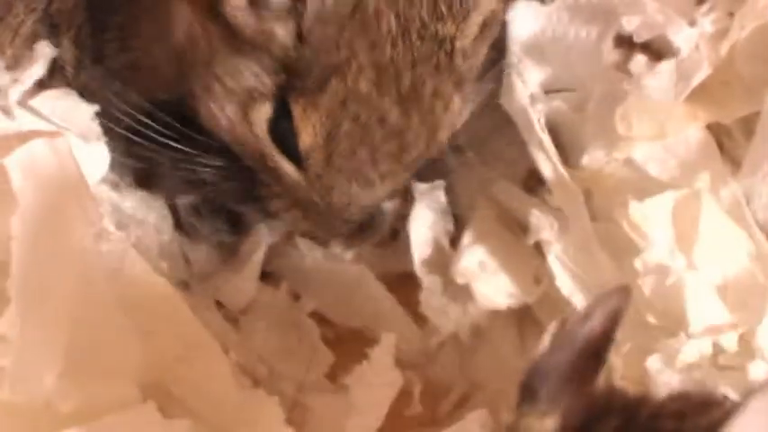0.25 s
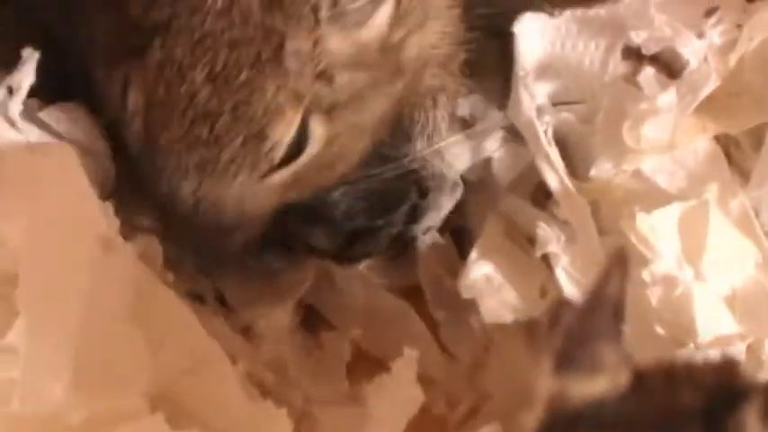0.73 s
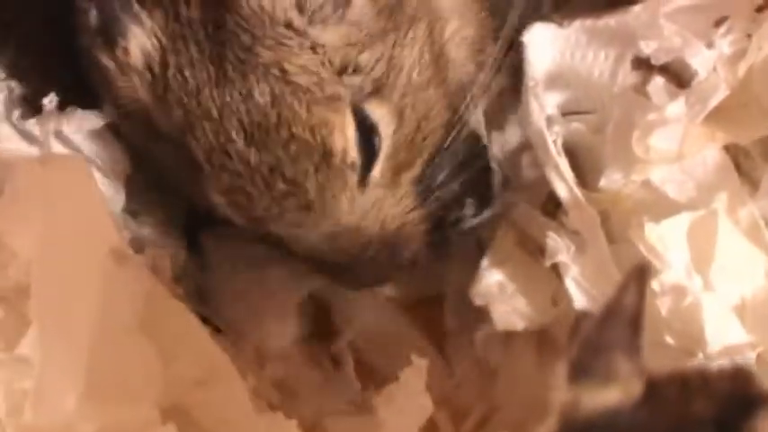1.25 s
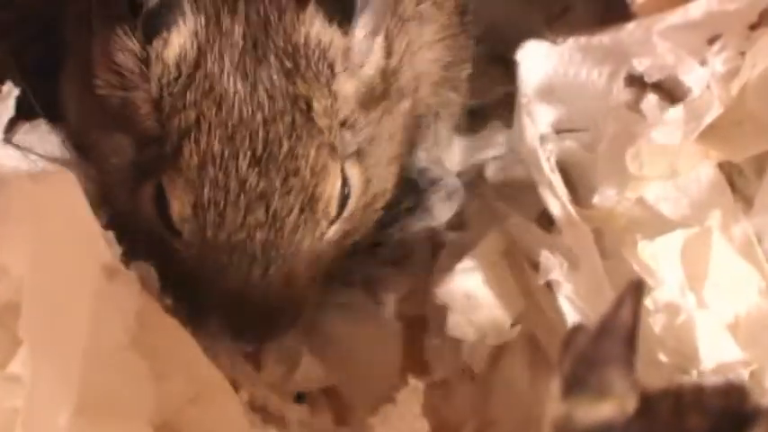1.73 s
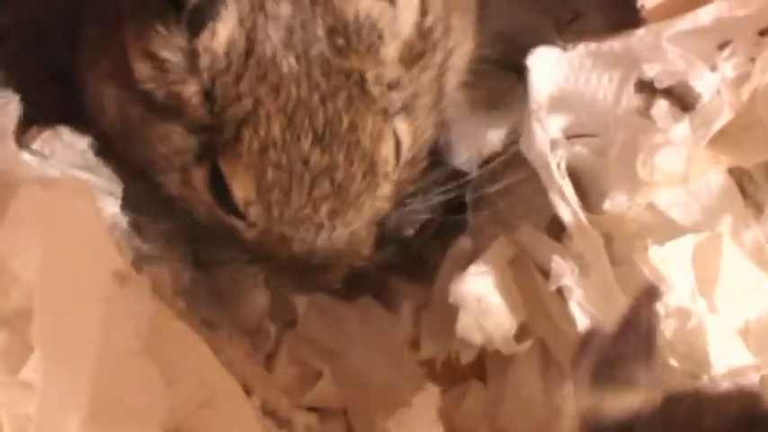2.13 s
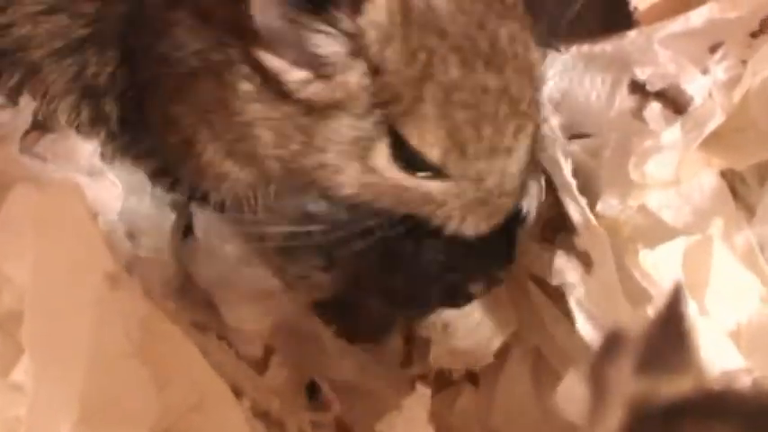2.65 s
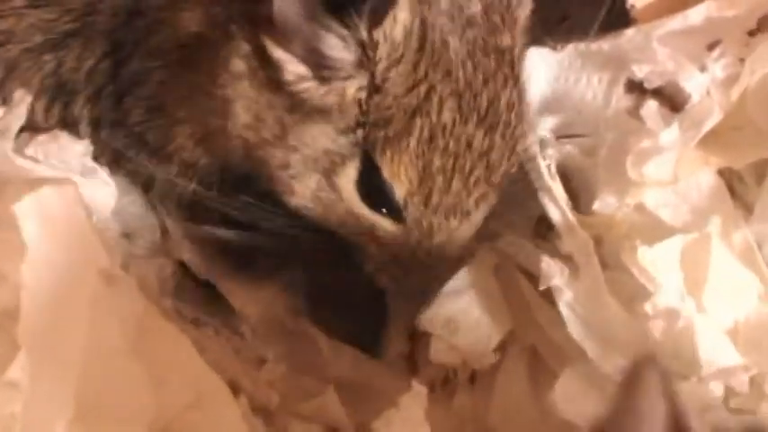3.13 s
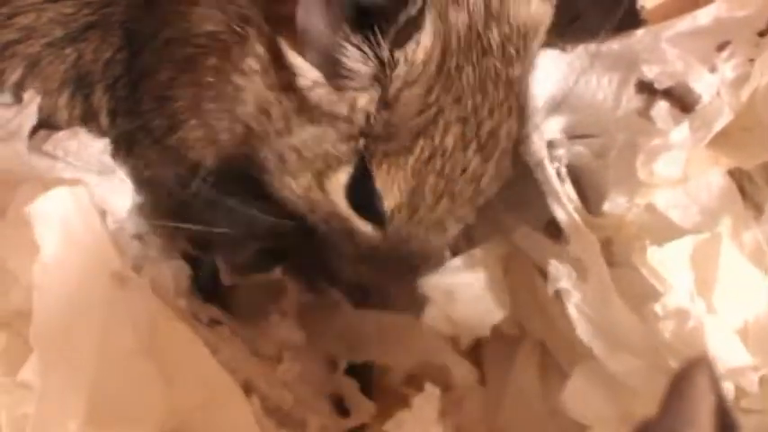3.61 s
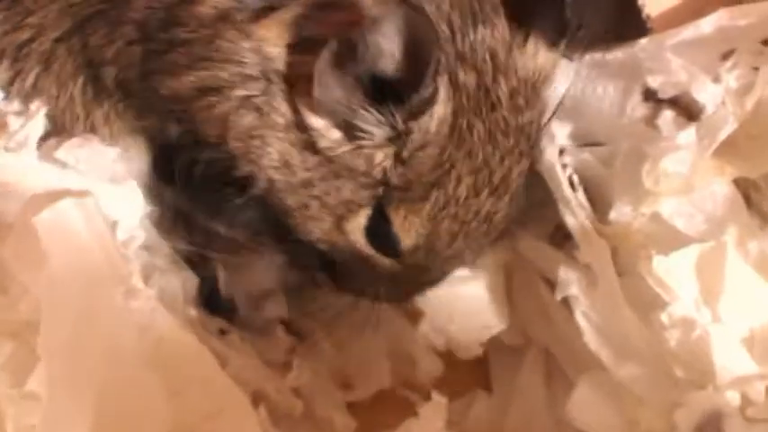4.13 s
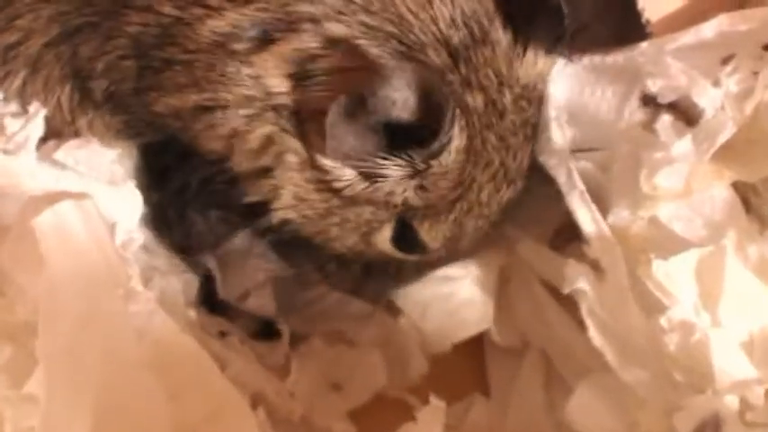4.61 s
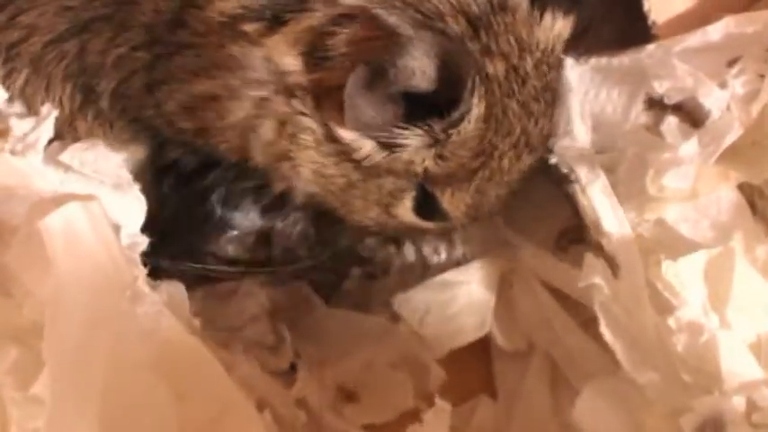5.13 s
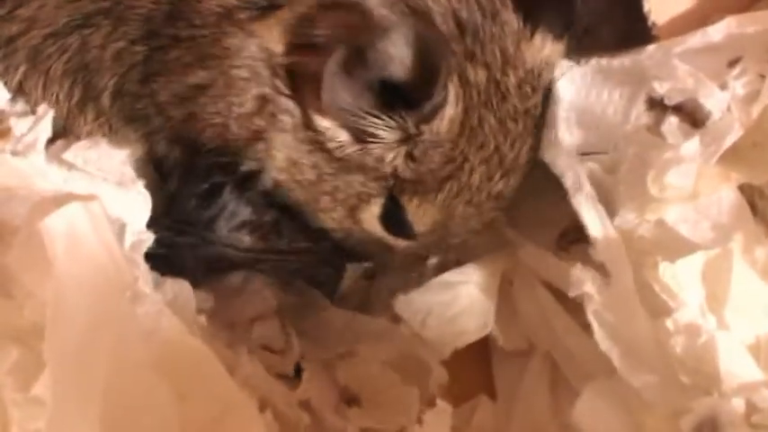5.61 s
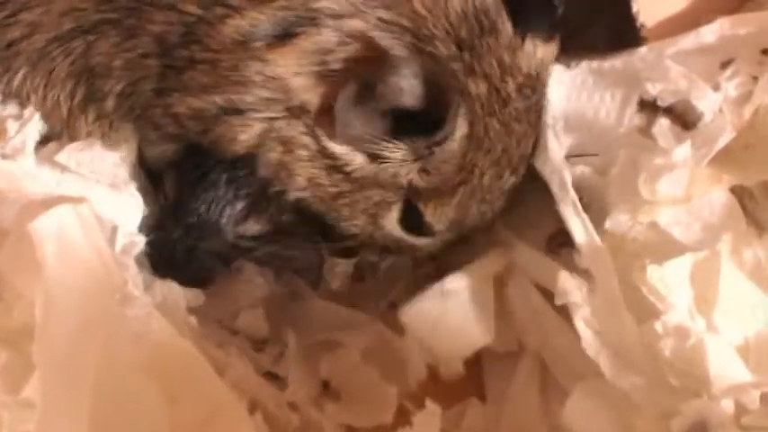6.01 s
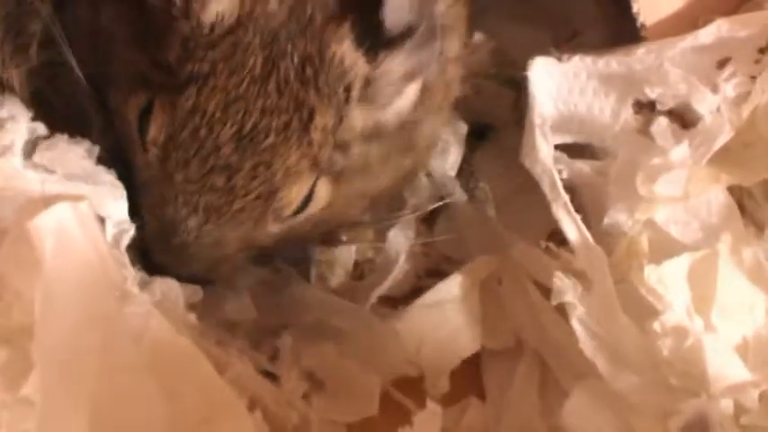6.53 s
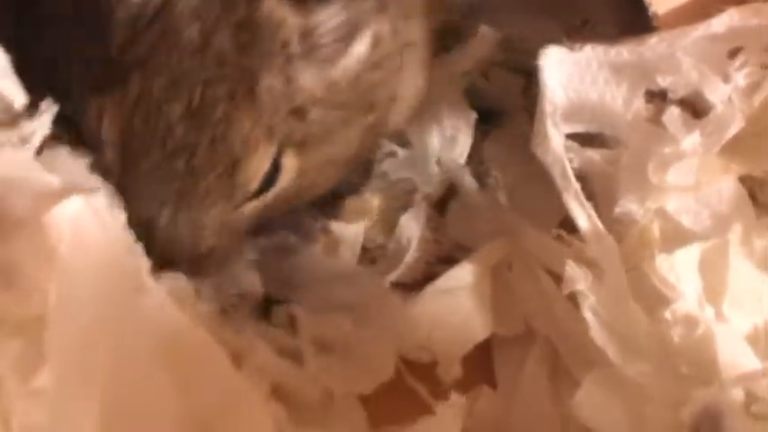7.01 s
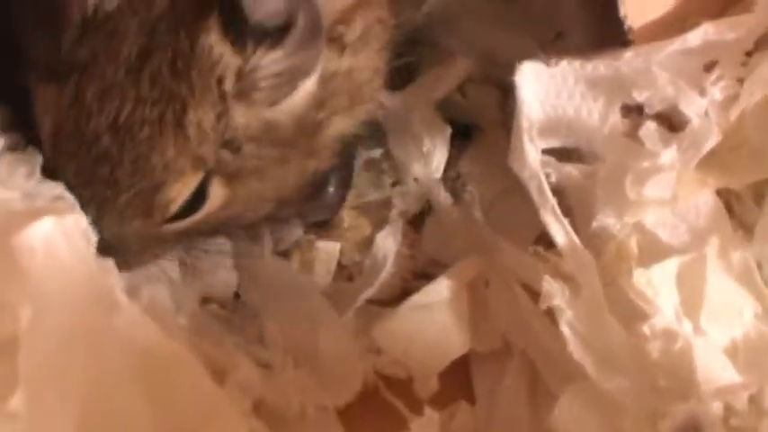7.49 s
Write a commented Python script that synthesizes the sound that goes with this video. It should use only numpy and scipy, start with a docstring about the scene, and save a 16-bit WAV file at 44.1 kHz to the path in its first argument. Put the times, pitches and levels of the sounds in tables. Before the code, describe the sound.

Close stereo sound of a paper nest in a quiet small room, with faint hiss, a fluttering airy hiss, a weak fan tone and a low wavering hum. At 0 s a clipped raspy squeak and light paper rustle, then a pair of joined squeaks at 0.25. A thin high whistle holds around 0.9-1.2, followed by low, rough little cries at 1.2, 1.3 and 1.75. Another faint whistle runs from 1.9; a squeak at 2.2 meets a sharp bright tick at 2.3, then a rising-loudness whine slides downward until 2.5. Squeaks return at 3.4, with a bright piercing one at 3.8 and another at 4.9. Paper crackles in swells from 4.3 to 5.9. Hollow cage knocks cluster at 5.75-5.95, ringing briefly. A softer bump at 6.2, a clear squeak at 6.6, rustle and whistle near 7, a raspy squeak at 7.2, and tiny whimpers end at 7.7.

```python
"""Degu pups in a nest of shredded paper squeak and whistle close to a camera as their mother noses at them.
Squeaks are gliding harmonics with rasping breath, split cycles and cracked tails; whistles are nearly pure.
Paper is showers of tiny filtered pulses; ticks and cage bumps are struck resonances.
A wavering low hum, a faint fan tone, coloured hiss and a fluttering hiss fill the quiet room.
Cage echoes, a diffuse tail and the two microphones' spacing place the sounds in stereo."""
import sys
import numpy as np
from scipy import signal
from scipy.fft import rfft, irfft, next_fast_len
from scipy.io import wavfile
from scipy.ndimage import uniform_filter1d, map_coordinates

SR = 44100
rng = np.random.default_rng(int(sys.argv[2]) if len(sys.argv) > 2 else 0)


def master_out(mix):
    """Clip the mix to full scale and print it as 16-bit PCM to the path in sys.argv[1]."""
    frames = np.transpose(np.atleast_2d(mix))
    ceiling = np.clip(frames, -1, 1)
    pcm = np.round(ceiling * 32767).astype(np.int16)
    wavfile.write(sys.argv[1], SR, pcm)


N = 342216
TOP_HZ = 15900  # band limit of the overtones and of the camera


def amp(db):
    """Decibels to gain."""
    return 10 ** (np.asarray(db) / 20)


def unit(x):
    """Scale to rms 1."""
    return x / np.sqrt(np.mean(x ** 2) + 1e-20)


def along(points, hz):
    """Interpolate (Hz, value) points on a log frequency axis."""
    f, value = np.transpose(points)
    return np.interp(np.log(hz + 1), np.log(f + 1), value)


def wobble(n, rate):
    """A smooth random curve, rate knots a second."""
    knots = rng.standard_normal(int(n * rate / SR) + 4)
    return map_coordinates(knots, [np.arange(n) * rate / SR])


def fade(n, edge):
    """A gate that opens and closes within edge seconds."""
    i = np.arange(n)
    return np.clip(np.minimum(i, i[::-1]) / (edge * SR), 0, 1)


def filtered(x, response):
    """Multiply the spectrum of x by a response of frequency."""
    n = x.shape[-1]
    m = next_fast_len(n + 8192)
    spectrum = rfft(x, m) * response(np.fft.rfftfreq(m, 1 / SR))
    return irfft(spectrum, m)[..., :n]


def resonance(f, centre, width):
    """Causal response of one damped mode."""
    return 1j * f * width / (centre ** 2 - f ** 2 + 1j * f * width)


def add(track, s, x):
    """Mix x into the track from time s."""
    part = track[..., max(round(s * SR), 0):][..., :x.shape[-1]]
    part += x[..., :part.shape[-1]]


def spread(pair, spectrum):
    """Two unrelated noises become coloured, partly alike stereo of rms 1."""
    # likeness of left and right: (frequency [Hz], correlation [-1 to 1])
    likeness = [(60, 0.65), (180, -0.34), (550, -0.57), (1650, 0.38), (4970, 0.17), (15000, 0.92)]

    def mix(f):
        turn = np.arccos(np.clip(along(likeness, f), -1, 1)) / 2
        return amp(along(spectrum, f)) * [np.cos(turn), np.sin(turn)]

    mid, side = filtered(pair, mix)
    return unit(np.array([mid + side, mid - side]))


def arch(rise, fall, tail, start_hz, crest_hz, end_hz, tail_hz, bend,
         low_db, high_db, crest_rough, end_rough):
    """Vocal effort climbs and sags, and may crack into a tail: pitch, two levels, roughness, cracking."""
    # body resonances the fundamental glides through: (frequency [Hz], gain [dB])
    chest = [(900, -0.5), (1150, -6), (1400, 1), (1720, 2), (2030, -3.5), (2300, -0.5), (2600, -3.5),
             (2900, 7), (3400, 1.5)]
    onset_share, onset_db, onset_rough = 0.22, 26, 0.31  # overtones swell over this share of the rise
    effort_db_per_octave, tiring_db_per_s = 14.5, 27  # overtones grow with pitch, ebb after the crest
    crack_s, crack_rough, tail_rough, tail_fade_db = .018, 0.5, 0.24, 16
    release_s, release_db = 0.0019, 14  # the voice shuts off
    attack_s, attack_db = 0.015, 2  # the fundamental starts this much softer
    tail_sag, waver, least_waver = 0.0695, 0.026, 0.0065  # shares of the pitch

    def ease(u, power):
        return np.sin(np.pi / 2 * np.clip(u, 0, 1)) ** power

    t = np.arange(int((rise + fall + tail) * SR)) / SR
    rising = t / rise
    falling = np.clip((t - rise) / fall, 0, 1)
    since = np.maximum(t - rise - fall, 0)  # seconds into the tail
    jump = ease(since / crack_s, 1.89)
    dying = (since / max(tail, crack_s)) ** 2
    crack = np.sin(np.pi * np.clip(since / crack_s, 0, 1) ** .5)

    rough = crest_rough + onset_rough * (1 - ease(rising, 0.54))
    rough = rough + (end_rough - crest_rough) * ease(falling, 0.88)
    rough = rough + crack_rough * crack + tail_rough * jump

    pitch = start_hz + (crest_hz - start_hz) * ease(rising, bend)
    pitch = pitch + (end_hz - crest_hz) * ease(falling, 3.3 / bend)
    effort_db = effort_db_per_octave * np.log2(pitch / crest_hz)
    effort_db = effort_db - tiring_db_per_s * fall * falling
    effort_db = effort_db - onset_db * (1 - ease(rising / onset_share, 0.62))
    pitch = (pitch + (tail_hz - end_hz) * jump) * (1 - tail_sag * dying)
    pitch = pitch * (1 + (least_waver + waver * rough) * wobble(len(t), 130.9))

    fading_db = tail_fade_db * dying + release_db * np.exp((t - t[-1]) / release_s)
    fundamental_db = low_db + along(chest, pitch) - attack_db * np.exp(-t / attack_s) - fading_db / 2
    overtone_db = high_db + effort_db - fading_db
    return pitch, fundamental_db, overtone_db, rough, ease(2 * since / crack_s, 0.58)


def squeak(pitch, fundamental_db, overtone_db, rough, mouth_hz, mouth_width, top_hz,
           glide=0.0013, jitter=0.033, shimmer_db=7.0, rasp=0.72, least_rasp=0.0081, split=0.17,
           leak=0.035, low_db=-3.5, high_db=0, grunt_hz=1100, grunt_width=550, grunt_db=-1, halving_db=5):
    """Tiny vocal folds sound through the mouth; under strain they shake, split the period and rasp."""
    # colour of throat and mouth: (frequency [Hz], relative gain [dB])
    throat_gain = [(1500, 6.5), (2600, 10.5), (3800, 5.5), (5000, 2.5), (6200, -2), (7900, 4), (9200, 1),
                   (10300, 4), (11800, 4), (12700, 9.5), (14000, -1), (15800, 3.5)]
    n, rough = len(pitch), np.clip(rough, 0, 1)
    # the folds' tension cannot change at once
    pitch = uniform_filter1d(pitch, max(int(glide * SR), 1), mode="nearest")
    phase = 2 * np.pi * np.cumsum(pitch * (1 + jitter * rough * wobble(n, 892.5))) / SR

    def mouth(f):
        opening = abs(resonance(f, mouth_hz, mouth_width)) + leak
        rolloff = 1 / np.sqrt(1 + (f / top_hz) ** 10)
        return opening * amp(along(throat_gain, f)) * rolloff * (f < TOP_HZ)

    def throat(f):
        return resonance(f, grunt_hz, grunt_width)

    # alternate strong and weak cycles put lines halfway between the harmonics
    order = np.arange(3, 29)[:, None] / 2
    weight = mouth(order * pitch) * np.where(order % 1, split * np.sqrt(rough), 1)
    partials = weight * np.sin(order * phase + rng.uniform(0, 2 * np.pi, order.shape))
    lines = partials.sum(0) / np.sqrt((weight ** 2).sum(0) / 2 + 1e-12)

    # air escapes once a cycle
    breath = unit(filtered(rng.standard_normal(n) * (1 + np.cos(phase)), mouth))
    share = np.clip(least_rasp + rasp * rough ** 1.22, 0, 1)
    overtones = np.sqrt(1 - share) * lines + np.sqrt(share) * breath

    # split and irregular cycles also ring the throat's lowest resonance
    halved = amp(halving_db) * abs(throat(pitch / 2)) * np.sin(phase / 2)
    irregular = unit(filtered(rng.standard_normal(n), lambda f: throat(f) ** 2))
    grunt = halved + amp(grunt_db) * irregular
    shaken = np.sqrt(2) * (1 - rough / 2) * np.sin(phase + rough * wobble(n, 696))
    fundamental = unit(shaken + rough ** 2.73 * grunt)

    voice = amp(fundamental_db + low_db) * fundamental + amp(overtone_db + high_db) * overtones
    shimmer = unit(amp(shimmer_db * np.sqrt(rough) * np.tanh(wobble(n, 607.2))))
    return voice * shimmer * fade(n, edge=0.00026)


def squeaks():
    """Each arched cry drives the folds, with its own mouth resonance."""
    # cries: (start [s], rise [s], fall [s], cracked tail [s], start, crest, end and tail pitch before
    # sag and waver [Hz], bend of the rise [1 early, 2 late], fundamental and overtones before shaping [dB],
    # overtones' step in the tail [dB], base roughness at crest and end [0-1], mouth resonance [Hz],
    # its width [Hz], where overtones begin to fall away [Hz])
    cries = [ (0, 0.0018, 0.0141, .006, 2040, 2074, 2034, 2120, 1.5, -43, -35.5, -14, 0.61, 0.31, 10000, 1900, 13500),
             (0.244, 0.016, 0.025, 0.018, 1253, 1366, 1298, 1290, 1.4, -46, -49.5, 0, .05, 0.12, 10100, 2100, 13000),
             (.287, 0.036, 0.037, 0.017, 1317, 2288, 2018, 2470, 2.8, -44, -31.5, 1.5, 0.3, 0.21, 10000, 2100, 13000),
             (1.182, 0.058, 0.027, 0, 1126, 1310, 1152, 1130, 2.3, -41, -44.5, 0, 0.31, 0.49, 6400, 1200, 15500),
             (1.291, .016, 0.0033, 0, 984, 1200, 1250, 1250, 1.92, -39.5, -49, 0, .3, .4, 8400, 2200, 8700),
             (1.309, .022, 0.0077, 0, 1314, 1701, 1720, 1720, 1.27, -41, -36, 0, .2, .25, 8100, 2400, 14400),
             (1.742, 0.038, 0.045, 0.0062, 1207, 1455, 1161, 1170, 3, -43.5, -49.5, 7, 0.38, 0.45, 7200, 3700, 9000),
             (2.181, 0.022, .018, 0.0016, 1060, 993, 1000, 940, 1.5, -42, -51, 0, 0.49, 0.5, 8350, 1800, 8850),
             (2.207, 0.034, .036, 0, 1001, 1847, 1335, 1320, 1.5, -42.5, -44.5, 0, 0.42, 0.17, 8650, 1800, 8800),
             (3.399, .02, 0.0021, 0.0026, 1410, 1640, 1650, 1650, 1.44, -39.5, -40, 0, .25, .1, 8300, 2720, 17400),
             (3.418, .029, .016, .021, 1645, 2027, 2030, 2385, 0.92, -39, -29.5, -2.5, 0.05, 0.14, 8970, 2700, 17400),
             (3.718, 0.024, 0.0018, 0.0016, 1367, 1800, 1784, 1840, 1.94, -44, -33, 0, 0.18, .35, 11340, 900, 11500),
             (3.811, 0.044, 0.05, 0.062, 1350, 2916, 2605, 3483, 2.5, -41, -22, -8, 0.022, .08, 11740, 2000, 10850),
             (4.906, .056, .04, .015, 997, 2545, 2628, 3235, 1.35, -38.5, -25.5, -5, 0.03, 0.064, 12300, 2320, 11000),
             (6.568, 0.052, 0.035, 0.0078, 1085, 2584, 2020, 2285, 1, -38, -28.5, -2, 0.028, 0.18, 9300, 5400, 12100),
             (7.212, 0.041, .04, 0.032, 1133, 2306, 1904, 2400, 1.9, -39.5, -32.5, -9, 0.42, 0.18, 8300, 3000, 10600)]
    out = np.zeros(N)
    for row in cries:
        s, *shape, low_db, high_db, tail_db, crest_rough, end_rough, mouth_hz, mouth_width, top_hz = row
        pitch, fundamental_db, overtone_db, rough, cracked = arch(
            *shape, low_db, high_db, crest_rough, end_rough)
        overtone_db = overtone_db + tail_db * cracked
        add(out, s, squeak(pitch, fundamental_db, overtone_db, rough, mouth_hz, mouth_width, top_hz))
    return out


def background(hum_db=-1, overtone=1.72, overtone_db=-11, air_db=-56.22, fan_hz=398, fan_db=-72):
    """Coloured room noise, a wavering hum with one weak upper tone, and a fan's faint drifting tone."""
    # hum pitch before drift: (time [s], frequency [Hz])
    hum_pitch = [(0, 74.07), (2.5, 74.53), (3.0, 58.4), (3.4, 59.7), (3.8, 72.55), (4.3, 69.1), (4.9, 74.9),
                 (5.5, 62.5), (6.8, 71.6), (7.3, 54)]
    # hum level before the hum_db trim: (time [s], level [dB])
    hum_level = [(0, -56), (.54, -59), (.62, -50), (1.2, -58.5), (1.4, -62), (1.77, -61), (2.0, -66),
                 (3.0, -61), (3.55, -66), (3.7, -60.5), (4.18, -59), (4.28, -62), (4.6, -60.5),
                 (4.72, -52.5), (4.92, -50.5), (5.0, -69.5), (7.76, -67.5)]
    # colour of the room hiss: (frequency [Hz], relative density [dB per Hz])
    air_colour = [(22, -26.5), (32, -11.5), (52, -4), (75, -6), (100, -9), (135, -4), (210, -11.5),
                  (290, -7), (600, -13.5), (1000, -16), (2000, -20.5), (5000, -24), (8000, -29),
                  (15800, -34.5)]
    t = np.arange(N) / SR
    pitch = np.interp(t, *np.transpose(hum_pitch))
    level_db = np.interp(t, *np.transpose(hum_level))

    def tone(hz, drift_hz):
        phase = 2 * np.pi * np.cumsum(hz + drift_hz * wobble(N, 20)) / SR
        return unit(np.sin(phase) * amp(4.7 * wobble(N, 9)))

    hum = tone(pitch, drift_hz=1.28) + amp(overtone_db) * tone(overtone * pitch, drift_hz=2.5)
    fan = amp(fan_db) * tone(fan_hz, drift_hz=5.34)
    air = amp(air_db) * spread(rng.standard_normal((2, N)), air_colour)
    return amp(level_db + hum_db) * hum + fan + air


def flutter(level_db=-65):
    """A faint hiss flutters in a few narrow bands of noise, partly in step."""
    # hiss bands: (centre [Hz], width of each of two filter passes [Hz], relative level [dB])
    hiss_bands = [(2295, 146, -8.5), (3043, 257, -8.5), (3770, 320, -12), (5220, 1000, -7)]

    def tremble():
        return amp(3.5 * np.tanh(wobble(N, 40)))

    hiss = np.zeros((2, N))
    for hz, width, db in hiss_bands:
        noise = rng.standard_normal((2, N))
        band = unit(filtered(noise, lambda f: resonance(f, hz, width) ** 2))
        hiss += amp(db) * tremble() * band
    return amp(level_db) * unit(hiss * tremble())


def fibres(n, rate):
    """Countless tiny slips of paper: sparse random pulses of unequal size, rate a second."""
    return (rng.random((2, n)) < rate / SR) * rng.standard_normal((2, n))


def bedding(rustle_db=4, crisp_db=-2, clump_db=0.5):
    """Fur and paws push through the paper strips; each stir swells and dies away."""
    # stirs: (peak [s], dying time [s], rustle before trim [dB], crisp top before trim [dB])
    stirs = [(.04, 0.026, -57.5, -69), (.128, 0.043, -56.5, -58.5), (.68, 0.042, -61, -70),
             (.92, 0.073, -60.5, -77), (4.0, 0.36, -61.5, -64), (4.32, 0.22, -52.5, -54),
             (4.46, .1, -53, -60.5), (4.76, .25, -54, -56), (4.9, .1, -59, -68), (5.08, 0.13, -59, -63),
             (5.384, 0.061, -52.5, -54), (5.56, 0.6, -56.5, -58.5), (5.86, .25, -51, -56),
             (6.27, 0.18, -54, -59.5), (6.55, 0.035, -64, -66), (6.975, 0.064, -56, -58)]
    # colour of the rustle: (frequency [Hz], relative density [dB per Hz])
    paper_colour = [(120, -44), (200, -6), (384, -5), (423, -4.5), (715, -6), (1060, -5.5), (1860, -8.5),
                    (2150, -6), (6440, -16), (9000, -31.5), (11700, -52), (19800, -120)]
    # colour of the crisp top: (frequency [Hz], relative density [dB per Hz])
    crisp_colour = [(4000, -16), (7000, -6), (10000, -4.5), (13000, -9), (16000, -21.5)]
    rise_ratio, fall_db = 0.84, 10  # rise time over dying time; level lost in each of those times
    t = np.arange(N) / SR
    body, top = np.zeros((2, N))
    for s, length, body_db, top_db in stirs:
        distance = np.maximum(t - s, (s - t) / rise_ratio) / length
        swell = amp(-fall_db * np.minimum(distance, 10))
        body = np.hypot(body, amp(body_db) * swell)
        top = np.hypot(top, amp(top_db) * swell)
    rustle = amp(rustle_db) * body * spread(fibres(N, rate=8200), paper_colour)
    crisp = amp(crisp_db) * top * spread(fibres(N, rate=10000), crisp_colour)
    return (rustle + crisp) * amp(clump_db * wobble(N, 79.6))


def whistle(length, pitches, db, fading_db, level_db=0.5, octave_db=-10, dull_hz=6000,
            jitter=0.0078, waver=0.0068, shimmer_db=2):
    """A nearly pure whine bends smoothly and droops; its octave weakens as the pitch climbs."""
    droop, droop_s = 0.17, 0.0077  # share of pitch lost by the last moment
    n = int(length * SR)
    u = np.linspace(0, 1, n)
    bend = np.polyval(np.polyfit(np.linspace(0, 1, 4), pitches, 3), u)
    pitch = bend * (1 - droop * np.exp((u - 1) * length / droop_s))
    unsteady = 1 + jitter * wobble(n, 284) + waver * wobble(n, 24.6)
    phase = 2 * np.pi * np.cumsum(pitch * unsteady) / SR
    octave = amp(octave_db) / (1 + (2 * pitch / dull_hz) ** 6)
    tone = unit(np.sin(phase) + octave * np.sin(2 * phase))
    loudness_db = db + level_db - fading_db * (u - .5) + shimmer_db * wobble(n, 68.6)
    return tone * amp(loudness_db) * fade(n, edge=0.007)


def whistles():
    """The pups' thin whines, each a single bending tone."""
    # whines: (start [s], length [s], pitch at start, one third, two thirds and end before droop [Hz],
    # mid level before trim [dB], level lost from start to end [dB])
    whines = [(0.665, .027, 1860, 2180, 2870, 3300, -55, 9),
              (0.913, 0.27, 4000, 3830, 3830, 3730, -59.5, 3.5),
              (1.826, 0.034, 1240, 1200, 1190, 1000, -56.5, 15),
              (1.857, 0.025, 1400, 1930, 2330, 4400, -56, 3),
              (1.904, .35, 3430, 3800, 3800, 3700, -63.5, 2),
              (2.338, .184, 3280, 2660, 2290, 2100, -57.5, -24.5),
              (6.864, .042, 2400, 3940, 3500, 2900, -60, -3), (6.985, .24, 3790, 3670, 3680, 3600, -56, 2),
              (7.661, 0.038, 1336, 1450, 3600, 2900, -56.5, 7),
              (7.736, 0.024, 1280, 970, 1730, 1700, -57.5, 0)]
    out = np.zeros(N)
    for s, length, *pitches, db, fading_db in whines:
        add(out, s, whistle(length, pitches, db, fading_db))
    return out


def blows(rows, chatter):
    """Each contact is a push and a dying chatter that ring a damped resonance."""
    out, t = np.zeros(N), np.arange(SR // 2) / SR
    for s, db, hz, width, t60 in rows:
        decay = amp(-60 * t / t60)
        force = chatter * rng.standard_normal(len(t)) * decay + (t == 0)
        # two passes narrow the band, so each is made wider
        ring = filtered(force, lambda f: resonance(f, hz, 1.23 * width) ** 2)
        add(out, s, amp(db) * ring * np.linalg.norm(decay) / np.linalg.norm(ring))
    return out


def ticks():
    """Sharp ticks of paper and teeth: brief contacts ring damped resonances."""
    # ticks: (time [s], level [dB], centre [Hz], width before broadening [Hz], chatter t60 [s])
    contacts = [(2.2845, -28.5, 4280, 1110, 0.023), (2.2847, -29, 9200, 3480, 0.0096),
                (2.757, -48, 2500, 1200, 0.034), (2.7575, -43, 8200, 1700, .025),
                (4.322, -44, 1480, 2500, .03), (6.7285, -45, 5000, 8000, 0.011)]
    return blows(contacts, chatter=0.37)


def bumps():
    """Every bump on the cage or its floor rings all its modes, most of all those near its own pitch."""
    # bumps: (time [s], level [dB], chatter t60 [s], strongest at [Hz], loss away from there [dB per octave])
    knocks = [(2.467, -41.5, 0.0098, 590, 0.5), (3.956, -42, 0.021, 400, 40), (4.237, -50, 0.039, 457, 20),
              (4.32, -50.5, .15, 600, 2), (4.46, -51.5, 0.24, 500, 8), (5.358, -47.5, 0.39, 1400, 20),
              (5.445, -48, 0.16, 1050, 8), (5.7555, -31.5, .04, 534, 50), (5.761, -35, 0.03, 615, 50),
              (5.775, -32.5, 0.062, 561, 52), (5.79, -34, .03, 600, 52), (5.798, -41.5, 0.27, 614, 36),
              (5.832, -45, 0.09, 570, 40), (5.9062, -35, .35, 980, 6), (5.912, -33.5, 0.26, 490, 9.5),
              (5.935, -33.5, 0.15, 465, 30), (6.231, -44.5, 0.26, 278.4, 12.5), (6.912, -47, 0.4, 139, 10),
              (6.918, -49.5, 0.36, 810, 7), (7.0, -51, 0.29, 400, 3)]
    # cage modes: (frequency [Hz], width before broadening [Hz], relative level [dB])
    modes = [(145, 77, 3.5), (299, 56, -4), (434, 187, -2), (576, 200, 1), (970, 540, 2), (1610, 1000, -1)]
    hz, width, mode_db = np.transpose(modes)
    rows = []
    for s, db, t60, centre_hz, slope_db in knocks:
        share_db = mode_db - slope_db * abs(np.log2(hz / centre_hz))
        # the modes together carry the bump's level
        share_db = share_db - 20 * np.log10(np.linalg.norm(amp(share_db)))
        rows += [(s, db + d, f, w, t60) for d, f, w in zip(share_db, hz, width)]
    return blows(rows, chatter=0.35)


def ports(x):
    """The camera body shades and delays its two microphones differently at each frequency."""
    # level of left over right: (frequency [Hz], difference [dB])
    shading = [(1000, -1.5), (5000, -2.5), (8300, -3.5), (9300, 0.5), (10300, 6.5), (13000, 0.5)]
    # phase by which left leads: (frequency [Hz], lead [rad])
    lead = [(3000, 0.24), (5500, 0.047), (8200, 0.99), (10500, 0.89), (12000, 0.12)]
    half = np.array([[1], [-1]]) / 2
    return filtered(x, lambda f: amp(half * along(shading, f)) * np.exp(1j * half * along(lead, f)))


def walls(x, wall_db=-8, latest=.008, dull_hz=8500, count=8):
    """The close walls of the cage send dull echoes, differently to each microphone."""
    echoes = np.zeros((2, SR // 20))
    for side in echoes:
        arrival = (SR * rng.uniform(.0004, latest, count)).astype(int)
        side[arrival] = rng.choice([-1, 1], count) / np.sqrt(count)
    bounced = signal.fftconvolve(x, echoes, axes=1)[:, :N]
    bounced = filtered(bounced, lambda f: 1 / np.sqrt(1 + (f / dull_hz) ** 6))
    return x + amp(wall_db) * bounced


def room(x):
    """A diffuse tail of decaying noise, different at each microphone."""
    # room decay: (frequency [Hz], t60 [s])
    decay_times = [(200, 0.62), (2000, 0.31), (8000, 0.22), (15000, 0.15)]
    hz, t, z = signal.stft(rng.standard_normal((2, SR // 2)), SR, nperseg=256)
    decay = amp(-60 * t / along(decay_times, hz)[:, None])
    tail = signal.istft(z * decay, SR, nperseg=256)[1]
    return signal.fftconvolve(x.mean(0)[None], tail / np.linalg.norm(tail[0]), axes=1)[:, :N]


def scene():
    """The nest is near the microphones; nest and cage sound into the room."""
    nest = walls(ports(squeaks() + whistles() + ticks()))
    cage = np.tile(bumps(), (2, 1))
    near = nest + cage + bedding()
    tails = amp(-9.0) * room(nest) + amp(-10.5) * room(cage)
    return near + tails + background() + flutter()


def record(dry):
    """The camera keeps nothing above its band limit."""
    return filtered(dry, lambda f: f < TOP_HZ)


dry = scene()
out = record(dry)
master_out(out)
```